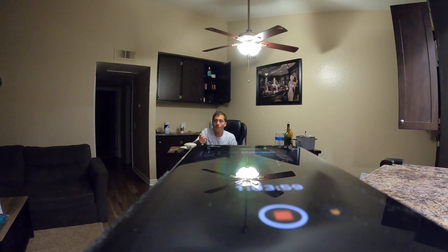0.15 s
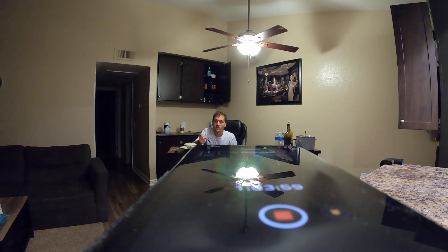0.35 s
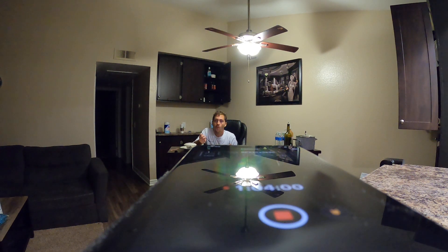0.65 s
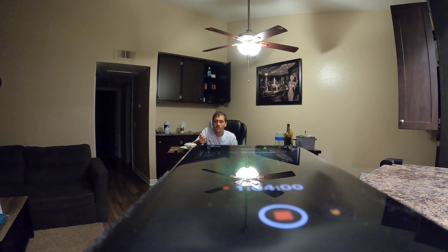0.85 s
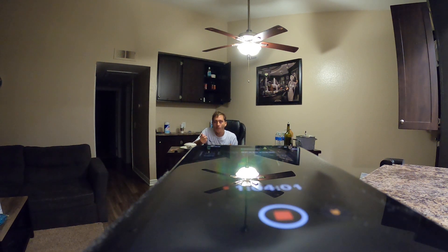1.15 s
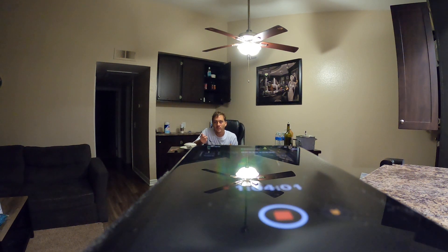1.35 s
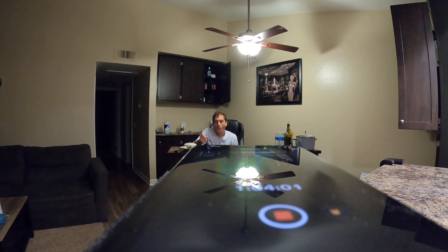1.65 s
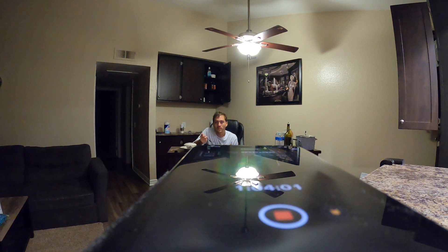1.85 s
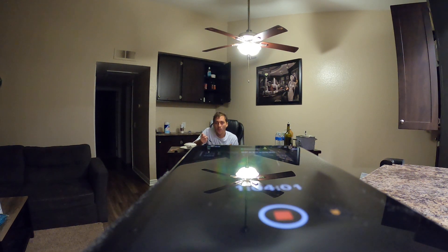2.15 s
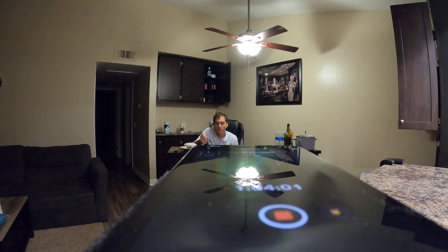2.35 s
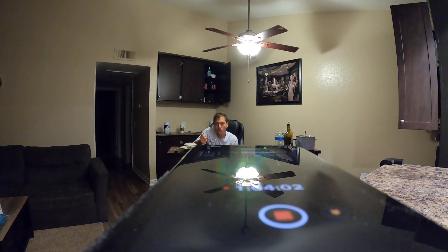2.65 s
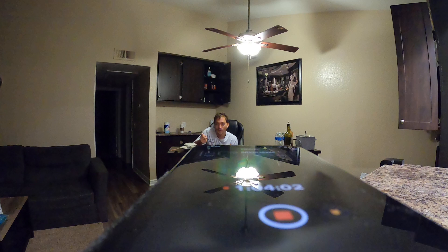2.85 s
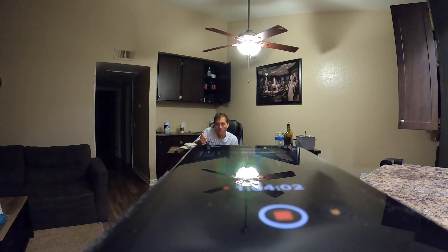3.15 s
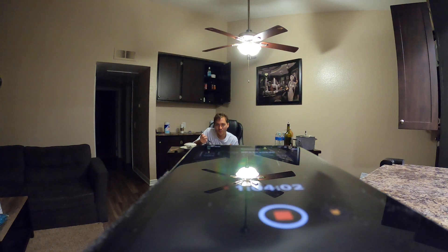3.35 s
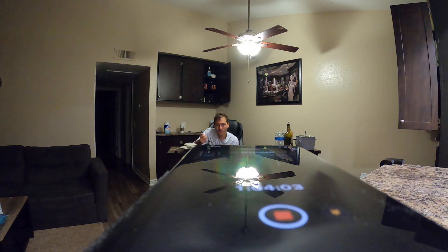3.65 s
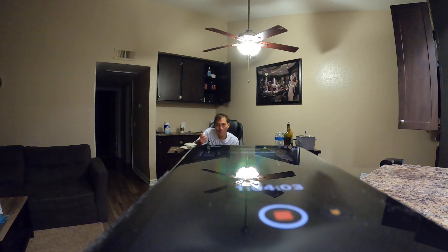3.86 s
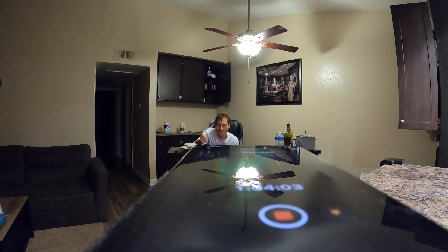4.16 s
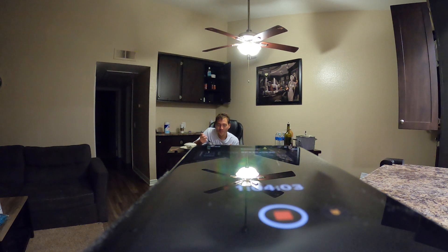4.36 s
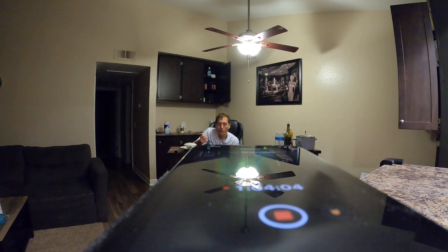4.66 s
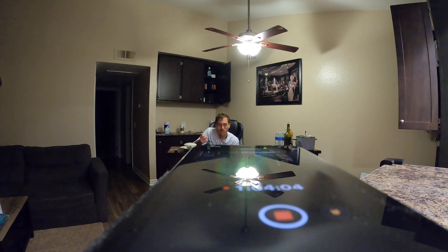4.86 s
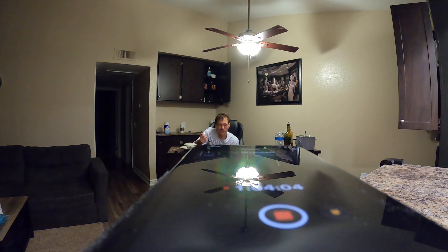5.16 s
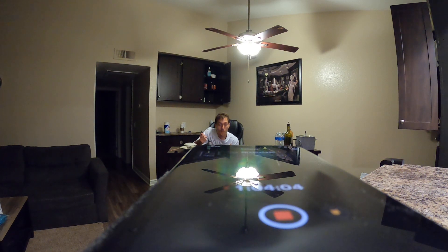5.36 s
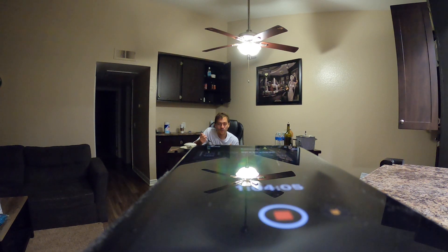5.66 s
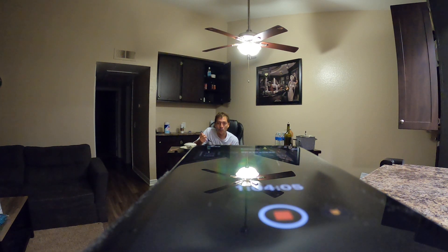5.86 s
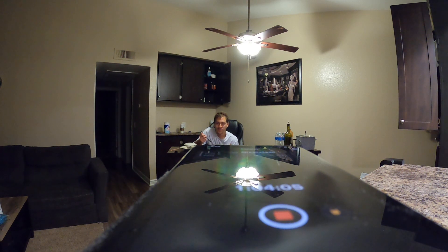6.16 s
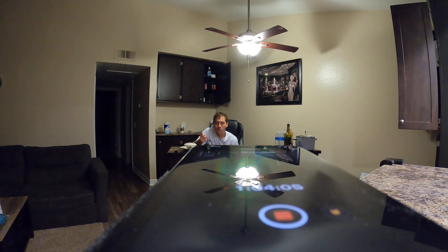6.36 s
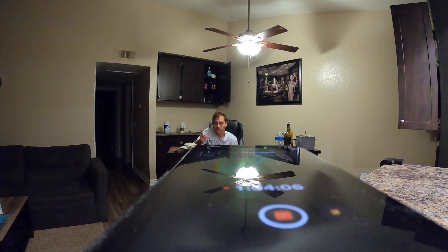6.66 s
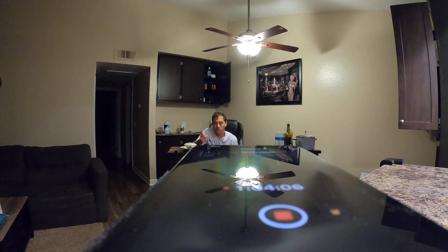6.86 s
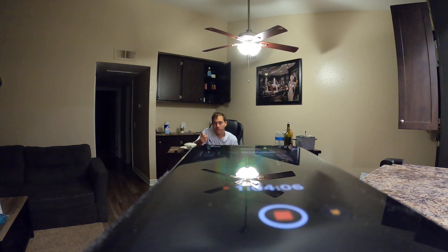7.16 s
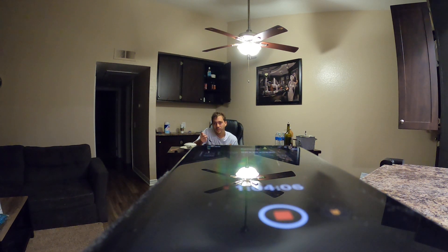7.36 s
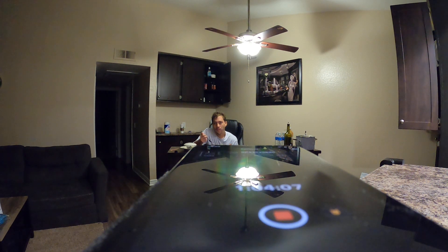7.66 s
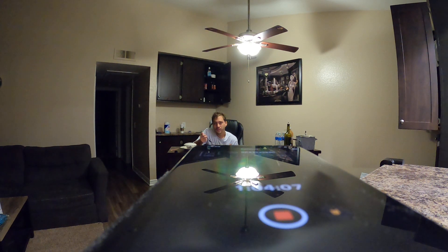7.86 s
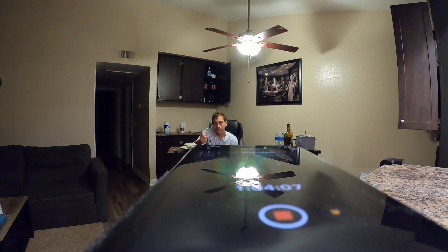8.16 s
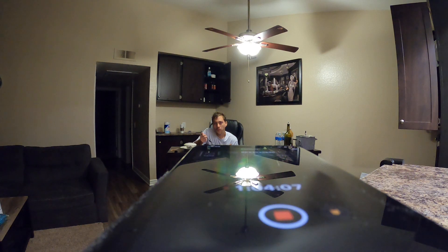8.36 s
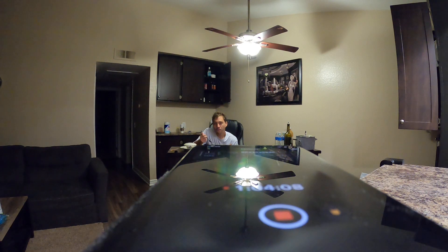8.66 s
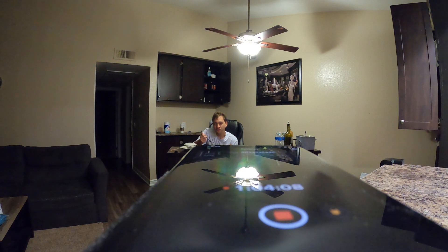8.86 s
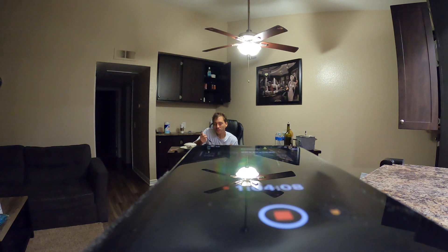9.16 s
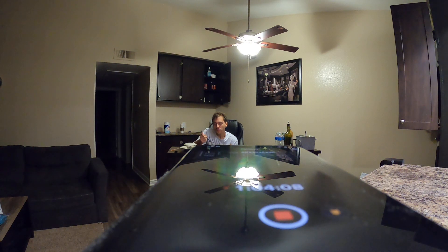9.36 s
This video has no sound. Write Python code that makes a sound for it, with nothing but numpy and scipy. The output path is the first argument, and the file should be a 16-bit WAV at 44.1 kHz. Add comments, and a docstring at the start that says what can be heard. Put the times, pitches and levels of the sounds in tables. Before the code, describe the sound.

Steady low appliance hum, gently beating, fills a furnished room with short reverberation. Over it come light fabric movements and tiny roomy clicks, the rustling longest just before three seconds. Then a close, woody, rattling bump on the table, several blows run together, with two weak after-taps. The rest is hum, soft air and a thin whine growing slightly on the left, with scattered faint ticks until about eight and a half seconds.

```python
"""A quiet living room at night, heard by a small stereo microphone lying on a table.
A fridge compressor, a comb of shaft multiples, hums, whines and beats against the mains hum;
two small fans and one faint high whine are sines of wandering pitch over moving air, filtered noise.
Someone seated shifts: cloth rustles as grains of noise, something clicks as short coloured impulses,
and one clumsy knock, a run of blows, excites the damped modes of the table top."""
import sys
import numpy as np
from scipy import signal
from scipy.fft import rfft, irfft
from scipy.io import wavfile
from scipy.ndimage import uniform_filter1d

SR = 44100
rng = np.random.default_rng(int(sys.argv[2]) if len(sys.argv) > 2 else 0)


def master(y):
    """Save y as 16-bit WAV."""
    cut = np.clip(np.atleast_2d(y).T, -1, 1)
    pcm = np.round(cut * 32767)  # scale
    wavfile.write(sys.argv[1], SR, pcm.astype(np.int16))


N = 419391  # length [samples]

# strong compressor lines: (multiple of the shaft rate, rms level [dB], left minus right [dB])
STRONG_LINES = [(2, -48.5, 2), (3, -62.7, 1), (4, -54.6, 2), (5, -59.5, 2), (6, -53.5, 2), (7, -60.1, 2),
                (9, -63.1, 4), (13, -75.9, 2), (31, -73.7, 2), (32, -80.3, 5), (33, -89, 3), (34, -88.5, 5),
                (35, -89, 3), (40, -87.9, 3), (42, -88.9, 2), (47, -93, 4), (52, -90.7, 7), (53, -82.4, 3),
                (54, -79.4, -2), (55, -83.7, 3), (57, -88.6, 10), (59, -93, 14), (66, -92.5, 7),
                (58, -84.6, 6), (69, -92.5, 7), (71, -86.0, -3), (72, -92.5, 6), (73, -77.7, 9),
                (76, -84.5, 7), (77, -88.2, 3), (84, -94.1, 9), (86, -95.0, 7), (87, -94.0, 7),
                (97, -96.3, 5), (113, -91.4, -14), (114, -91.1, -9), (116, -97, 0), (125, -94.5, 8),
                (129, -97.6, 20)]
# mean level of all weaker multiples: (frequency [Hz], rms level [dB])
WEAK_LINES = [(60, -82), (600, -88), (1200, -91), (2000, -96), (5000, -102), (6300, -108), (7300, -103),
              (9000, -122)]
# fan tones, and last a faint high tone beside the compressor's whine:
# (frequency [Hz], rms level [dB], pitch wander [Hz])
PURE_TONES = [(51.75, -60, .03), (206.98, -50, .08), (301.2, -61, .1), (376.45, -60, .1), (4404.9, -90, .3)]
# blows on the table: (time [s], strength [dB], contact [s], crack peak before the room [dB],
#                      favoured mode frequency at the struck spot [Hz], crack ring [Hz])
TABLE_BLOWS = [(3.111, -22, .006, -51, 245, 1900), (3.1213, -28, .00145, -46, 252, 1500),
               (3.1356, -39, .0006, -50, 510, 1000), (3.1498, -24, .0026, -45, 920, 1850),
               (3.1646, -23.5, .004, -55, 128, 1000), (3.1775, -16, .00155, -43, 120, 1050),
               (3.1888, -23.5, .00125, -46, 246, 1500), (3.1958, -46, .0009, -39, 420, 1850),
               (3.2058, -17.5, .0023, -42, 500, 3300), (3.2134, -29, .0008, -41, 890, 1900),
               (3.2348, -31, .0004, -46, 470, 2600), (3.2645, -27, .0018, -55, 238, 1000),
               (3.2915, -33.5, .0034, -60, 173, 1900), (3.4052, -29.5, .0022, -56, 246, 1900),
               (3.4412, -33.5, .0023, -56, 244, 1900)]
# modes of the table top: (frequency [Hz], level [dB], t60 [s])
TABLE_MODES = [(19, -13, .18), (47.8, -6.5, .4), (114, -14, .16), (173, -7, .175), (245, 1, .11),
               (295.5, -12, .45), (328, -8, .11), (423.5, -.5, .1), (487.5, -7, .4), (524, -14, .12),
               (604, -7, .05), (738, -19, .3), (788, -13.5, .16), (910, -10.5, .2), (1011, -7.5, .13)]
# small dry clicks: (time [s], peak before the room [dB], tilt [dB per octave], ring [Hz], ring boost [dB])
CLICK_EVENTS = [(.37, -50.5, -6.5, 1600, 6), (1.182, -41, -1.5, 3200, -1), (1.186, -42, 2, 5600, 15),
                (1.196, -39, 3, 1910, 17.5), (1.215, -49, 0, 4300, 3), (1.235, -46, 0, 3400, 5),
                (1.255, -51, 3, 5500, 6), (1.274, -54, 3, 1900, 8), (1.189, -49, 2, 1700, 9),
                (1.828, -43.5, -3, 1860, 13), (1.849, -51, 5, 1870, 7), (1.87, -58, 4, 1950, 10),
                (1.885, -53, 7, 5000, 4), (1.9, -49, -2, 6030, 12), (3.734, -62, 2, 910, -3),
                (3.91, -53, 0, 2300, 8), (4.045, -53, 2, 3700, 8), (4.07, -57, -2, 4000, 15),
                (4.1, -59, 0, 2000, 8), (4.46, -52, 5, 3800, 6), (4.489, -52.5, 1, 4000, 10),
                (4.51, -59, 2, 2000, 10), (4.7, -56, -1, 2000, 8), (5.7, -57, 0, 2000, 9),
                (5.91, -62, 6, 1950, 21), (5.96, -65, 9, 2000, 22), (5.99, -61, 6, 2100, 25),
                (7.2, -64, -1, 1950, 16), (8.043, -51.5, 0.5, 2600, 6), (8.062, -57, 4, 2700, 5),
                (8.1, -62, 6, 3200, 9), (8.361, -48, -4, 1900, 3), (8.372, -57, 0, 3300, 8),
                (8.43, -62, 8, 8500, 10)]
# spectrum shape of a dry snap: (frequency [Hz], relative density [dB per Hz])
SNAP_SPECTRUM = [(400, -31.5), (700, -2.5), (950, -2.5), (1300, -6), (2000, -7.5), (2600, -10), (3500, -12),
                 (4500, -20.5), (5700, -21.5), (8800, -29), (11500, -55)]
# movements of cloth on the chair: (start [s], length [s], rms level [dB], gain of the treble [dB])
CLOTH_MOVES = [(-.1, 0.22, -64.5, -3), (0.17, 0.3, -66, 3.5), (0.514, 0.3, -67, -6),
               (0.918, 0.24, -66.5, 2.5), (1.3, 0.23, -68, -8), (1.827, 0.16, -66.5, 4.5),
               (1.985, 0.24, -67.5, 0), (2.192, 0.83, -60.5, 2), (3.068, 0.19, -50.5, 1),
               (3.32, 0.24, -65, 1), (3.898, 0.29, -70, -10), (4.312, 0.39, -67, -5), (5.62, 0.5, -74, -2),
               (7.168, 0.12, -76, 6), (8.02, 0.091, -74, 2), (8.3, 0.27, -78, 5)]
# spectrum shape of rubbing cloth: (frequency [Hz], relative density [dB per Hz])
CLOTH_SPECTRUM = [(300, -16.5), (900, 3), (1400, -3.5), (2050, 0.5), (2500, -3.5), (3000, -7.5), (3900, -3),
                  (4800, -7), (6500, -12.5), (8800, -23.5), (12000, -35.5)]
# moving air and appliance rumble: (frequency [Hz], density [dB per Hz])
AIR_SPECTRUM = [(20, -86), (37, -88.5), (45, -75), (65, -75), (150, -79), (350, -80), (530, -83.5),
                (650, -89.5), (1200, -99), (1900, -101), (2500, -108), (4300, -109), (7500, -120),
                (9500, -133), (13000, -138)]
# standing waves that the rumble excites: (frequency [Hz], width [Hz], shared sound above the air [dB])
STANDING_WAVES = [(56.4, 12, 0), (110, 47, 3), (185, 22, 5.5), (212.9, 27.6, 13), (237.9, 11, 8),
                  (292, 22, 9.5), (344.7, 25, 7), (445.5, 41, 3.5), (497, 22, 3.5), (770, 7, 3),
                  (3300, 740, 4.5), (4330, 560, 3), (4870, 370, 4), (6700, 300, 2), (7400, 520, 7)]
# likeness of the two channels: (frequency [Hz], likeness, limited to 0-1 when used)
CHANNEL_LIKENESS = [(30, .9), (100, 1), (300, 0.5), (500, 0.7), (800, 0.5), (1200, 0.63), (2000, 0.63),
                    (4000, -2), (8000, -1.5)]
# balance of the two channels: (frequency [Hz], left minus right [dB])
CHANNEL_BALANCE = [(60, 1.5), (500, 1), (1000, 1.5), (3000, 3), (8000, 3), (12000, -7.5)]
# reverberation of the room: (frequency [Hz], t60 [s])
ROOM_DECAY = [(150, 0.45), (600, 0.47), (2000, 0.32), (6000, 0.37), (12000, 0.061)]

LAG_S = .00007  # the left channel is this late
LEAD = 256  # samples of a crack ahead of its impulse

MAINS_HZ, MAINS_DB = 119.977, -54.3  # mains hum, mean level
IN_STEP_S = .13  # moment when twice the shaft rate and the mains hum are in step
# shaft rate at that moment, before its small wander, and its slow gain in speed
SHAFT_HZ, SPEEDUP_HZ_PER_S = 58.4933, .00175
# the whine grows on the left around a moment; on the right it is steady and out of step
WHINE_MULTIPLE, WHINE_BEFORE_DB, WHINE_GAIN_DB = 74, -75.5, 9.5
WHINE_GROWTH_S, WHINE_RISE_S = 4.3, 1.6
WHINE_RIGHT_DB, WHINE_TURN_RAD = -79, 2.95
PARTNER_DB = -80.5  # steady line one slip rate above the whine, left only; the two beat

SPOT_DB_PER_OCTAVE = 5  # loss of modes away from the favoured one, up to 1.5 octaves
TABLE_WET_DB = -16
# a movement swells over a share of its length and fades with a time constant; faint rubbing never stops
SWELL_SHARE, FADE_S, STILL_DB = .4, .04, -82
TOP_HZ = 13300


def undb(db):
    """Level to amplitude: 20 dB is a factor of ten."""
    return 10 ** (np.asarray(db) / 20)


def on_log(hz, table):
    """Pitch is logarithmic: read (frequency [Hz], value) rows on a log-frequency axis."""
    at, value = np.transpose(table)
    return np.interp(np.log(np.maximum(hz, 1)), np.log(at), value)


def colour(x, table, more_db=0):
    """Linear filtering: unit noise acquires the (frequency [Hz], density [dB per Hz]) spectrum."""
    hz = np.fft.rfftfreq(x.shape[-1], 1 / SR)
    gain = undb(on_log(hz, table) + more_db) * np.sqrt(SR / 2)
    return irfft(rfft(x) * gain, x.shape[-1])


def walk(rate):
    """Slow random drift: levels held 1 / rate s and smoothed twice; spread near 1."""
    hold = int(SR / rate)
    steps = np.repeat(rng.standard_normal(N // hold + 1), hold)
    return 1.16 * uniform_filter1d(uniform_filter1d(steps, hold), hold)[:N]


def pair(pan_db):
    """Level difference between channels: opposite gains for left and right."""
    return undb(np.array([[pan_db], [-pan_db]]) / 2)


def diffuse(mid_db=0):
    """Partial coherence: noise in two channels from a shared and an opposed part; mid_db lifts the shared."""
    hz = np.fft.rfftfreq(N, 1 / SR)
    alike = np.clip(on_log(hz, CHANNEL_LIKENESS), 0, 1)
    mid, side = rfft(rng.standard_normal((2, N))) * np.sqrt([(1 + alike) / 2, (1 - alike) / 2])
    mid = mid * undb(mid_db)
    # half the balance and half the lag for each channel
    half = undb(on_log(hz, CHANNEL_BALANCE) / 2) * np.exp(-1j * np.pi * hz * LAG_S)
    return irfft(np.array([(mid + side) * half, (mid - side) / half]), N)


def room(x, wet_db):
    """Reverberation: direct sound plus a noisy tail that decays exponentially at its own rate in each band."""
    t = np.arange(SR // 2) / SR
    hz = np.fft.rfftfreq(len(t), 1 / SR)
    noise = rfft(diffuse()[:, :len(t)])
    tail = 0
    for band, (_, t60) in enumerate(ROOM_DECAY):
        share = on_log(hz, [(row[0], j == band) for j, row in enumerate(ROOM_DECAY)])
        tail = tail + irfft(noise * share, len(t)) * undb(-60 * t / t60)
    tail = tail * (1 - np.exp(-t / 0.0026))  # echoes build up
    tail = tail * undb(wet_db) / np.sqrt(np.mean(np.sum(tail ** 2, axis=1)))
    return x * pair(2.3) + signal.fftconvolve(x[None], tail, axes=1)[:, :N]


def crack(db, tilt_db, decay_s, ring_hz=2000., ring_db=0):
    """Impulsive contact: a sharp impulse and weaker decaying fizz, coloured as a snap with one broad ring."""
    t = (np.arange(2048) - LEAD) / SR
    burst = 0.14 * rng.standard_normal(len(t)) * np.exp(-np.abs(t) / decay_s) * (t > 0)
    burst[LEAD] = 1
    hz = np.maximum(np.fft.rfftfreq(len(t), 1 / SR), 100)
    tilt = tilt_db * np.log2(hz / 2000)
    ring = ring_db / (1 + (6 * np.log2(hz / ring_hz)) ** 2)
    burst = colour(burst, SNAP_SPECTRUM, tilt + ring)
    return burst * undb(db) / np.abs(burst).max()


def add(track, s, sound):
    """Superposition: add a sound so that its sample LEAD falls at time s."""
    i = int(s * SR) - LEAD
    track[i:i + len(sound)] += sound


def compressor():
    """Periodic rotation gives a comb of shaft multiples; slip against the mains sways their phase."""
    t = np.arange(N) / SR - IN_STEP_S
    turn = np.cumsum(SHAFT_HZ + SPEEDUP_HZ_PER_S * t + .001 * walk(.7)) * 2 * np.pi / SR
    turn -= turn[int(IN_STEP_S * SR)]
    slip = 2 * np.pi * MAINS_HZ * t - 2 * turn
    strong = {round(k): (db, pan_db) for k, db, pan_db in STRONG_LINES}
    waver = [walk(2.52)[::64] for _ in range(5)]
    growth = 1 / (1 + np.exp((WHINE_GROWTH_S - IN_STEP_S - t) / WHINE_RISE_S))
    whine_db = WHINE_BEFORE_DB + WHINE_GAIN_DB * growth
    count = 152
    chance = rng.standard_normal((count, 3))
    out = np.zeros((2, N))
    # successive powers of the shaft phasor give the multiples; the sway grows with the multiple
    shaft = np.exp(1j * turn + .0025j * np.sin(slip))
    z = np.ones(N, complex)
    for k in range(1, count):
        z = z * shaft
        hz = k * SHAFT_HZ
        weak_db = on_log(hz, WEAK_LINES) + np.clip(4 * chance[k, 0], -12, 4)
        db, pan_db = strong.get(k, (weak_db, 3 + 7 * chance[k, 1]))
        # reflections scramble the phase, and for short waves also the lag between the channels
        start = 0 if k == 2 else 3 * chance[k, 2]
        spread = 2 * np.pi * hz * LAG_S + np.clip(k / 60 * chance[k, 1], -.8, .8)
        drift_db = .6 * waver[k % 5]
        gain = np.repeat(undb(db + drift_db), 64)[:N] * np.sqrt(2)
        ears = np.exp(1j * (start + np.array([[-spread], [spread]]) / 2)) * pair(np.clip(pan_db, -14, 14))
        ears /= max(abs(ears.mean()), .45)  # the level holds for the mean of both channels
        for channel, ear in zip(out, ears[:, 0]):
            channel += gain * (ear * z).real
        if k == WHINE_MULTIPLE:
            left = undb(whine_db) + undb(PARTNER_DB) * np.exp(1j * slip)
            right = undb(WHINE_RIGHT_DB) * np.exp(1j * WHINE_TURN_RAD)
            out[0] += np.sqrt(2) * (left * z).real
            out[1] += np.sqrt(2) * (right * z).real
    mains = undb(MAINS_DB + 0.65 * walk(0.83)) * np.sqrt(2) * np.cos(2 * np.pi * MAINS_HZ * t)
    return out + mains * pair(1.5)


def fans_and_high_whine():
    """Frequency-modulated sines: pure tones of the fans and one faint high whine wander a little."""
    out = 0
    for hz, db, wander_hz in PURE_TONES:
        phase = 2 * np.pi * (np.cumsum(hz + wander_hz * walk(0.94)) / SR + rng.random())
        out = out + undb(db + 0.56 * walk(1.3)) * np.sqrt(2) * np.cos(phase)
    return out * pair(1.6)


def table_ring(spot_hz):
    """Modal superposition: damped sines, strongest near the frequency that the struck spot favours."""
    t = np.arange(SR // 2) / SR
    ring = 0
    for k, (hz, mode_db, t60) in enumerate(TABLE_MODES):
        spot_loss_db = SPOT_DB_PER_OCTAVE * min(abs(np.log2(hz / spot_hz)), 1.5)
        mode = undb(mode_db - spot_loss_db - 60 * t / t60) * np.sin(2 * np.pi * hz * t)
        ring = ring + (-1) ** k * mode  # neighbouring modes start in opposite directions
    return ring


def knock():
    """Convolution of force and modal response: each blow pushes for its contact time, rings and cracks."""
    wood, snap = np.zeros(N), np.zeros(N)
    for s, db, contact_s, crack_db, spot_hz, ring_hz in TABLE_BLOWS:
        push = np.hanning(int(contact_s * SR) + 3)
        response = signal.fftconvolve(table_ring(spot_hz), push / push.sum())
        add(wood, s + LEAD / SR, undb(db) * response)  # the response has no lead
        add(snap, s, crack(crack_db, 0., 0.0064, ring_hz, 8.))
    return room(wood, TABLE_WET_DB) + room(snap, 9.6)


def clicks():
    """Impulses in a reverberant field: far snaps, heard mostly through the room."""
    out = np.zeros(N)
    for s, db, tilt_db, ring_hz, ring_db in CLICK_EVENTS:
        add(out, s, crack(db, tilt_db, 0.0019, ring_hz, ring_db))
    return room(out, 8.6)


def cloth():
    """Friction as dense noise grains: each movement swells, holds and fades; its treble has its own gain."""
    t = np.arange(N) / SR
    grains = undb(0.63 * walk(30) + 1.9 * walk(400)) * diffuse()
    rub = colour(grains, CLOTH_SPECTRUM)
    rub = rub / np.sqrt(np.mean(rub ** 2))
    treble = signal.sosfilt(signal.butter(2, 5000., "high", fs=SR, output="sos"), rub)
    gain, treble_gain = undb(STILL_DB), 0
    for s, length_s, db, bright_db in CLOTH_MOVES:
        rise = np.clip((t - s) / (SWELL_SHARE * length_s), 0, 1)
        fade = np.exp(-np.maximum(t - s - length_s, 0) / FADE_S)
        move = undb(db) * rise * fade
        gain = gain + move
        treble_gain = treble_gain + (undb(bright_db) - 1) * move
    return gain * rub + treble_gain * treble


def air():
    """Broadband noise with room resonance: slightly swelling; standing waves lift what both channels share."""
    hz = np.fft.rfftfreq(N, 1 / SR)
    bumps_db = sum(db / (1 + (2 * (hz - f) / width) ** 2) for f, width, db in STANDING_WAVES)
    return colour(diffuse(bumps_db), AIR_SPECTRUM) * undb(.5 * walk(1.575))


def scene():
    """Linear superposition of all sources at the microphone."""
    return compressor() + fans_and_high_whine() + knock() + clicks() + cloth() + air()


def record(dry):
    """Band limitation: a steep elliptic low-pass cuts the top."""
    return signal.sosfilt(signal.ellip(8, .2, 60, TOP_HZ, fs=SR, output="sos"), dry)


dry = scene()
out = record(dry)
master(out)
```